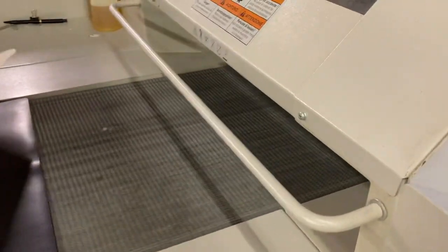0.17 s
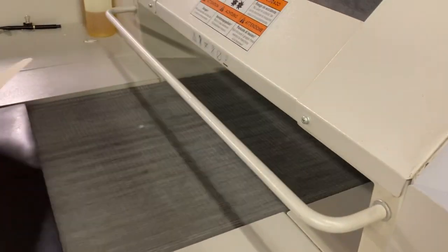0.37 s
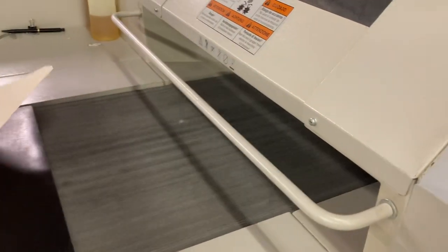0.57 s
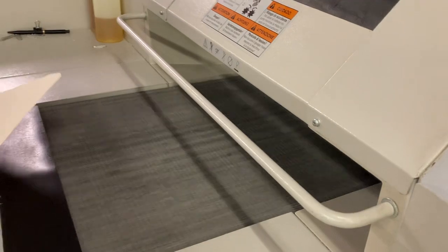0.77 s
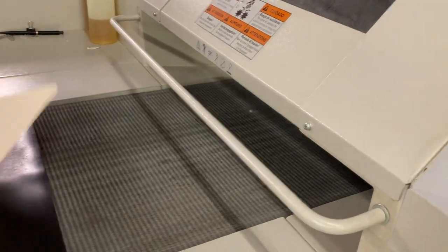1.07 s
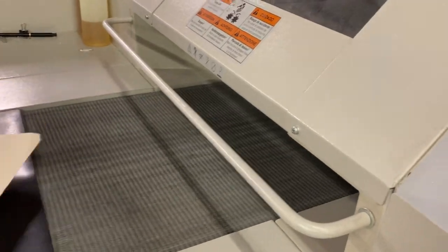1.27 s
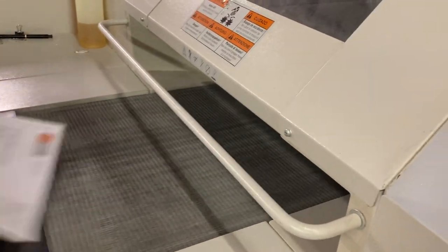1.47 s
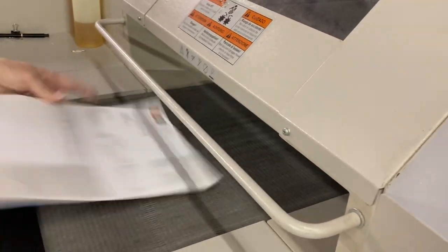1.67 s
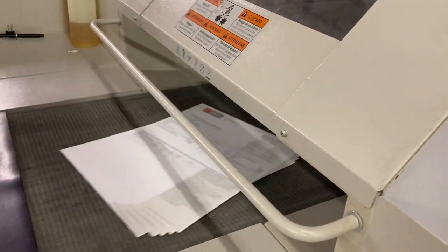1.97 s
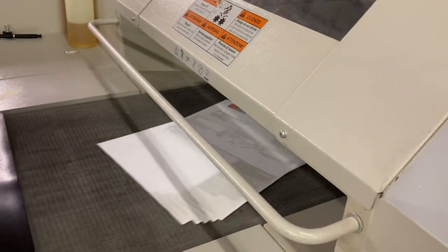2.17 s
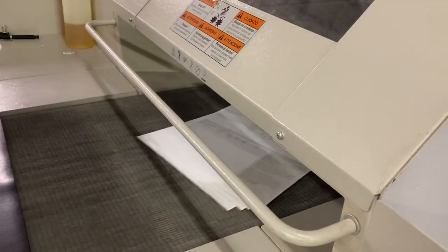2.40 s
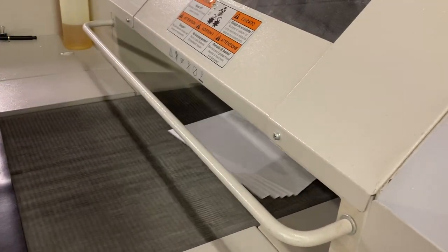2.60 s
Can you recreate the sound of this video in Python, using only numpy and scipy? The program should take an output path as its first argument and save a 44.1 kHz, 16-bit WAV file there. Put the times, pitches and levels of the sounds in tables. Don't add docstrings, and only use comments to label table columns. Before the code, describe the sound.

A heavy industrial shredder roars in a hard room, crunching paper for the first second, then humming emptier while sheets snap and a thrown stack flaps and lands on the belt, heard close in stereo.

```python
import sys
import numpy as np
from scipy import signal
from scipy.fft import rfft, irfft
from scipy.io import wavfile
from scipy.ndimage import uniform_filter1d

SR = 44100
rng = np.random.default_rng(int(sys.argv[2]) if len(sys.argv) > 2 else 0)


def how_loud(loudness_db):
    steps = np.asarray(loudness_db, float) / 20
    return 10 ** steps


def file_out(sig):
    cols = np.atleast_2d(sig).T
    lim = np.clip(cols, -1, 1)
    pcm = np.round(lim * 32767).astype(np.int16)
    wavfile.write(sys.argv[1], SR, pcm)


N = 120834


def colour(x, points):
    pitch_hz, level_db = np.array(points, float).T
    hz = np.maximum(np.arange(N // 2 + 1) * SR / N, 1)
    gain = how_loud(np.interp(np.log(hz), np.log(pitch_hz), level_db))
    y = irfft(rfft(x) * gain, N)
    return y / np.sqrt(np.mean(y ** 2))


def ring(x, hz, width_hz):
    return signal.lfilter(*signal.iirpeak(min(hz, .45 * SR), hz / width_hz, fs=SR), x)


def walk(rate_hz, count=1):
    k = int(SR / rate_hz)
    drift = uniform_filter1d(uniform_filter1d(rng.standard_normal((count, N)), k), k)
    return drift / drift.std(axis=1, keepdims=True)


def curve(points):
    start_s, level_db = np.array(points, float).T
    return how_loud(np.interp(np.arange(N) / SR, start_s, level_db))


def grit(spread_db, smear_s, patchy_db):
    tears = how_loud(spread_db * np.minimum(rng.exponential(size=N), 5)) ** 2
    k = np.exp(-1 / (smear_s * SR))
    crackle = np.sqrt(signal.lfilter([1 - k], [1, -k], tears))
    x = rng.standard_normal((2, N)) * crackle
    bands_hz = 1500 * 2 ** (np.arange(15) / 4)
    flicker = how_loud(patchy_db * walk(56.0, count=len(bands_hz))) - 1
    return x + sum(gain * ring(x, hz, hz / 7) for hz, gain in zip(bands_hz, flicker))


def tone(hz, wander):
    drift, share = walk(12, count=2), np.clip(wander, 0, 1)
    size = np.sqrt(1 - share ** 2) + share * (drift[0] + 1j * drift[1]) / np.sqrt(2)
    turns = hz * np.arange(N) / SR + rng.random((2, 1))
    return np.sqrt(2) * (size * np.exp(2j * np.pi * turns)).imag


TONE_PITCHES = [73.2, 290.5, 361, 398, 577, 719.3, 958.4, 1048.4, 1078.6, 1109, 1166.4, 1950]
# [level_db, wander 0-1]
TONE_LEVELS = [(-40, .4), (-40, .7), (-41, .75), (-41, .8), (-47, .8), (-44, .7), (-54, .5), (-51, .5),
               (-49, .65), (-54, .4), (-53, .4), (-57, .9)]
# [start_s, level_db]
GROWL_THROB = [(0.0, -25.5), (0.17, -41), (0.21, -25.5), (0.61, -39), (0.75, -22.5), (0.9, -31),
               (0.94, -50), (1.01, -37), (1.08, -43), (1.26, -29.5), (1.66, -39.5), (1.72, -26.5),
               (2.07, -36), (2.14, -31.5), (2.49, -31), (2.56, -45), (2.65, -29.5), (2.74, -26)]
MESH_THROB = [(0.0, -58), (0.08, -47), (0.13, -43), (0.26, -28.5), (0.37, -44), (0.62, -26.5), (0.69, -36),
              (0.89, -25), (1.14, -36), (1.47, -41), (1.61, -27.5), (1.66, -43), (1.98, -30.5), (2.04, -56),
              (2.1, -40.5), (2.74, -34)]
WHINE_THROB = [(0.0, -25), (0.21, -33), (0.24, -26.5), (0.42, -27), (0.45, -40), (0.55, -25), (0.64, -38),
               (0.68, -26), (1.07, -27.5), (1.09, -38), (1.33, -25.5), (1.54, -36), (1.72, -28),
               (1.75, -42), (1.85, -28.5), (2.4, -34.5), (2.56, -25), (2.74, -33.5)]


def gears():
    hum = sum(how_loud(db) * tone(hz, wander) for hz, (db, wander) in zip(TONE_PITCHES, TONE_LEVELS))
    growl = curve(GROWL_THROB) * tone(145.3, wander=.3)
    mesh = curve(MESH_THROB) * tone(218.2, wander=.35)
    whine = curve(WHINE_THROB) * tone(509.2, wander=.098)
    return hum + growl + mesh + whine


# [pitch_hz, level_db per Hz]
ROAR_COLOUR = [(18, -62), (40, -25.5), (139, -11), (472, -15), (511, -10.5), (612, -21), (7630, -54),
               (8920, -53), (15000, -67)]


def housing():
    roar = colour(grit(spread_db=4.0, smear_s=0.003, patchy_db=0.5), ROAR_COLOUR)
    air = rng.standard_normal((2, N))
    mouth = how_loud(-16) * ring(air, 676, 40) + how_loud(-30) * ring(air, 1784, 170)
    return how_loud(-28 + 0.82 * walk(2.1)) * roar + mouth


# [start_s, level_db]
PAPER_LOAD = [
    (0, 1),
    (.2, 2),
    (.35, -1),
    (.6, 2),
    (.75, 0.5),
    (.9, -4),
    (1.05, -6),
    (1.13, -25),
    (1.3, -16.5),
    (2.74, -25),
]
# [pitch_hz, level_db per Hz]
CHEW_COLOUR = [(40, -42), (90, -25), (120, -13), (300, -18.5), (1000, -16), (2500, -24), (6000, -33.5),
               (15000, -30)]
# [pitch_hz, width_hz, level_db]
PANEL_RINGS = [(113, 6.4, -29), (138, 15, 18), (255, 27, 20.5), (325, 56, 24), (681, 30, 19),
               (1820, 100, 6)]


def cutters():
    tearing = grit(spread_db=2.8, smear_s=.0015, patchy_db=2.5) * how_loud(1.1 * walk(35))
    shake = tearing / tearing.std()
    panels = sum(how_loud(db) * np.sqrt(SR / width_hz) / 40 * ring(shake, hz, width_hz)
                 for hz, width_hz, db in PANEL_RINGS)
    return how_loud(-31) * curve(PAPER_LOAD) * (colour(tearing, CHEW_COLOUR) + panels)


# [start_s, level_db]
FRAME_DRUMMING = [(0.0, -34.5), (0.41, -24.5), (0.45, -18.5), (0.57, -33), (0.6, -26), (0.72, -31.5),
                  (0.88, -36), (0.91, -24.5), (0.96, -41), (1.0, -29), (1.17, -46), (1.56, -42),
                  (1.67, -51), (1.69, -38), (2.0, -38), (2.02, -49), (2.3, -43), (2.74, -38)]


def frame():
    hz, width_hz = 118.9, 20.5
    x = ring(ring(rng.standard_normal((2, N)), hz, width_hz), hz, 2 * width_hz)
    x = x / np.sqrt(uniform_filter1d(x ** 2, int(.03 * SR)) + .1 * x.var())
    return curve(FRAME_DRUMMING) * x / x.std()


# [start_s, level_db]
RUSTLE_LEVEL = [(0, -36), (1.1, -41), (1.3, -50.5), (1.46, -63), (1.53, -64), (1.62, -73), (1.7, -43),
                (1.87, -60), (2.0, -43), (2.15, -47), (2.38, -72), (2.45, -56), (2.57, -55.5), (2.7, -47),
                (2.74, -49)]
# [pitch_hz, level_db per Hz]
PAPER_COLOUR = [(600, 5), (1800, -4), (3500, 9), (5000, 4.5), (7500, 1.5), (10000, 0.5), (13000, -7),
                (15500, -13)]


def rustle():
    whisper = colour(grit(spread_db=3.0, smear_s=.001, patchy_db=3.5), PAPER_COLOUR)
    return curve(RUSTLE_LEVEL) * how_loud(1.6 * walk(30)) * whisper


# [start_s, peak_db, hold_s, pitch_hz, brightness_db]
SHEET_SNAPS = [(0.177, -25, 0.0059, 3930, -10), (0.217, -22.5, 0.0099, 2600, -19),
               (0.764, -29.5, 0.0051, 3350, -4), (0.8908, -22, 0.0075, 7800, 3.5),
               (1.007, -27.5, 0.0056, 7500, 6), (1.059, -29, 0.0095, 7400, -19),
               (1.152, -26, 0.0087, 3070, 10.5), (1.275, -41.5, 0.0089, 3200, 11),
               (2.279, -42, 0.0059, 3260, 11.5), (2.406, -53, 0.0064, 3100, 17),
               (2.4286, -28, 0.0067, 3160, 4), (2.504, -46, 0.008, 3580, 15.5),
               (2.589, -46, 0.01, 10800, 9.5), (2.634, -23, 0.0079, 3320, 3), (2.67, -32, 0.0069, 3400, -4),
               (2.686, -30, 0.0098, 3180, -18), (2.7344, -37, 0.008, 4100, 11),
               (1.428, -43, 0.0045, 10500, 7), (1.468, -53, .004, 10500, 11), (2.053, -37, .005, 10400, 2),
               (2.186, -34.5, .005, 7400, 1), (2.722, -38, .004, 11100, 1), (0.955, -26.5, 0.014, 4650, -16),
               (1.49, -28.5, 0.008, 6200, 5), (1.516, -44, 0.0095, 3250, 17.5),
              (1.653, -40, 0.0049, 3400, -7), (1.7, -29, 0.0063, 3700, 11),
              (1.715, -30.5, 0.0039, 4000, -1), (1.753, -31, 0.012, 3100, 1.5),
              (1.799, -31, 0.008, 4900, 1), (1.824, -20.5, 0.0087, 9900, 5), (1.904, -39, 0.013, 3520, 3),
              (1.9408, -23, 0.0055, 7200, -2.5), (2.08, -35, 0.015, 3080, 4.5)]
DRY_TICKS = [
    (1.5935, -26.5, .0012, 4700, 3),
    (1.5975, -37, .0028, 11000, 5),
    (1.651, -33, .001, 11000, 5),
    (1.673, -22.5, .001, 12500, 4),
    (1.7985, -29, .0007, 9000, 4),
    (1.977, -26, .001, 6000, 2),
    (1.998, -30, .0012, 6950, 0),
    (2.6745, -31, .001, 7500, 3),
    (2.679, -32, .001, 12000, 4),
]


def snaps():
    t, hits = np.arange(N) / SR, SHEET_SNAPS + DRY_TICKS
    out = np.zeros((2, N))
    crackle = colour(grit(spread_db=3.0, smear_s=.0007, patchy_db=1.5), PAPER_COLOUR)
    for start_s, peak_db, hold_s, pitch_hz, bright_db in hits:
        span = slice(int((start_s - .004) * SR), int((start_s + .15) * SR))
        since = t[span] - start_s
        rise = np.exp(np.minimum(since, 0) / min(.0012, hold_s / 2))
        after = np.maximum(since - hold_s, 0)
        fall = np.exp(-after / hold_s) + how_loud(-17.5) * np.exp(-after / .017)
        env = rise * fall
        x = crackle[:, span] * env
        x = x / np.sqrt(np.sum(x ** 2) / np.sum(env ** 2) / 2)
        bright = (how_loud(bright_db) - 1) * ring(x, 12500, 7600)
        air = (hold_s < .003) * how_loud(12) * ring(x, 16300, 1900)
        x = x + bright + air
        luck = rng.random(2)
        rings = ring(x, pitch_hz, 460)
        rings = rings + 0.17 * ring(x, 3200 + 800 * luck[0], 140) + .5 * ring(x, 9600 + 600 * luck[1], 230)
        out[:, span] += how_loud(peak_db - 10.5) * (x + how_loud(-6) * 3 * rings)
    return out


def room(x):
    t60_s, tail_db = .18, -10
    t = np.arange(int(.3 * SR)) / SR
    tail = rng.standard_normal(len(t)) * np.exp(-np.log(1000) * t / t60_s) * (t > .003)
    tail = signal.sosfilt(signal.butter(2, 1500, "high", fs=SR, output="sos"), tail)
    tail = tail / np.sqrt(np.sum(tail ** 2))
    return x + how_loud(tail_db) * signal.fftconvolve(x, tail[None])[:, :N]


# [pitch_hz, right_lead_radians, likeness 0-1, left_minus_right_db]
PORT_PAIR = [(0, 0, .95, -4), (200, 0, .975, -1.4), (520, -.45, .93, 1), (1200, -.75, .55, 4.2),
             (1900, .45, .6, 1.4), (2500, -.5, .3, .8), (3400, -2, .55, 0), (4500, -2.7, .3, 0),
             (5500, -3.1, .58, 0), (6200, -1.5, .3, 0), (6850, 0, .8, 0)]


def ports(field):
    a, b = rfft(field)
    points, hz = np.array(PORT_PAIR, float), np.arange(N // 2 + 1) * SR / N
    lead, like, pan_db = (np.interp(hz, points[:, 0], column) for column in points.T[1:])
    turn = 2 * np.pi * np.maximum(hz - 6850, 0) / 4530
    lead = lead * (turn == 0) + turn - .7 * np.sin(2 * turn) / 2
    like = np.clip(like + (.97 - like) * np.minimum(turn / np.pi, 1), 0, 1)
    right = like * a * np.exp(1j * lead) + np.sqrt(1 - like ** 2) * b
    return irfft(np.array([a * how_loud(pan_db / 2), right * how_loud(-pan_db / 2)]), N)


def shimmer(pair):
    depth_db, from_hz, patch_hz, patch_s = 3.5, 1800, 220, .04
    turn = np.array([[1, 0.94], [1, -0.99]]) / np.sqrt(2)
    hz, t, z = signal.stft(turn @ pair, SR, nperseg=1024)
    patches = uniform_filter1d(rng.standard_normal(z.shape), int(patch_hz / hz[1]), axis=1)
    patches = uniform_filter1d(patches, int(patch_s / t[1]), axis=2)
    treble = np.clip(hz / from_hz - .5, 0, 1)[:, None]
    gain = how_loud(depth_db * treble * patches / patches.std())
    gain = gain / np.sqrt(np.mean(gain ** 2, axis=2, keepdims=True))
    return turn @ signal.istft(z * gain, SR)[1][:, :N]


def scene():
    noise = housing() + cutters() + rustle()
    steady, sharp = room(np.vstack([noise, snaps()])).reshape(2, 2, N)
    machine = gears() + frame() + steady
    return shimmer(ports(machine)) + ports(sharp)


def roll_off(x):
    return signal.sosfilt(signal.butter(12, 15830, fs=SR, output="sos"), x)


def record(dry):
    top_hz = 15350
    cut = signal.sosfilt(signal.ellip(8, .2, 70, top_hz, fs=SR, output="sos"), dry)
    return roll_off(cut)


dry = scene()
out = record(dry)
file_out(out)
```